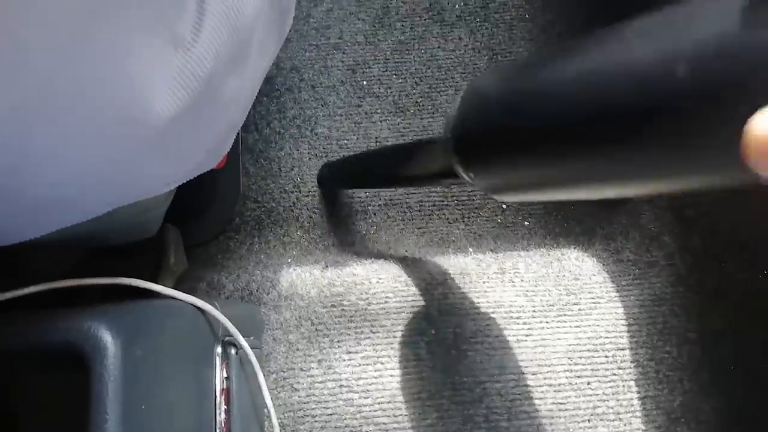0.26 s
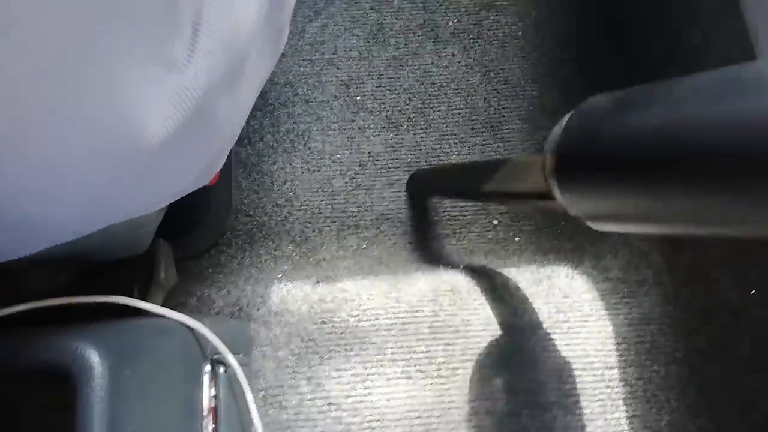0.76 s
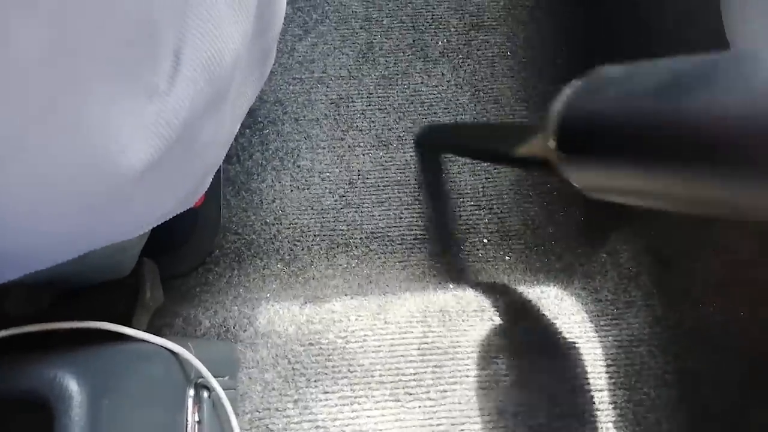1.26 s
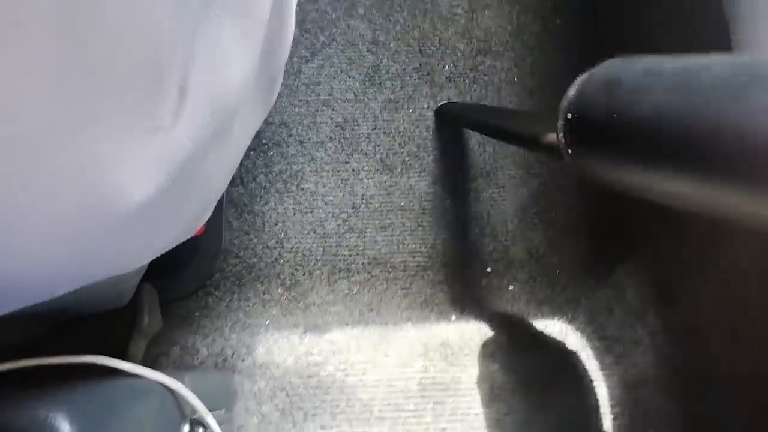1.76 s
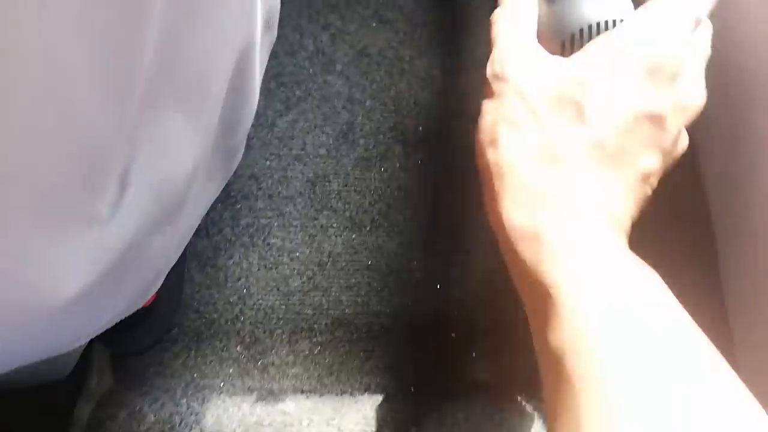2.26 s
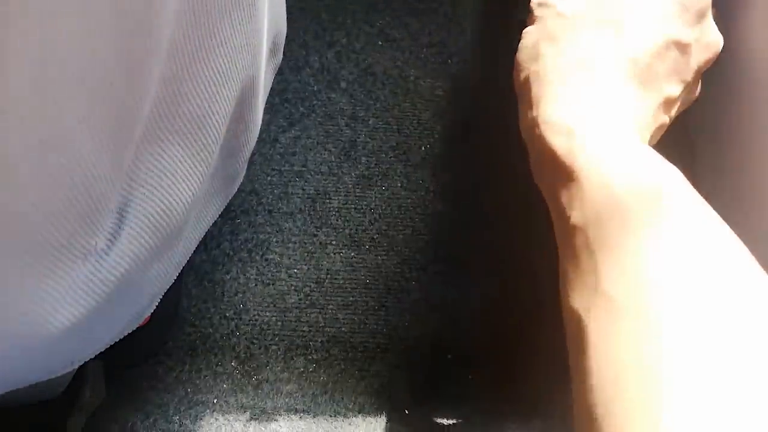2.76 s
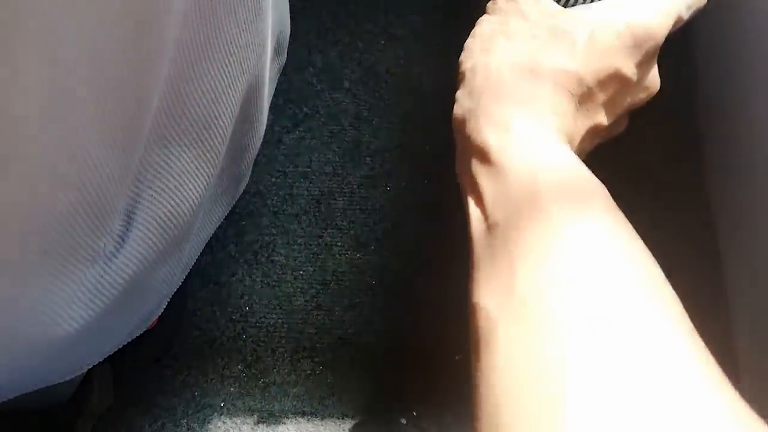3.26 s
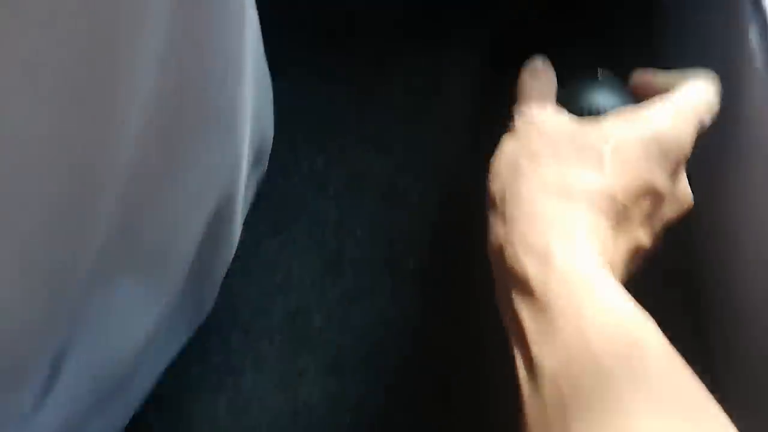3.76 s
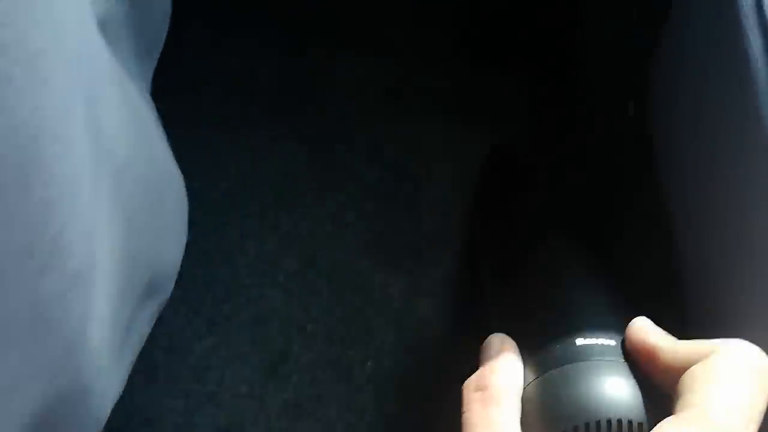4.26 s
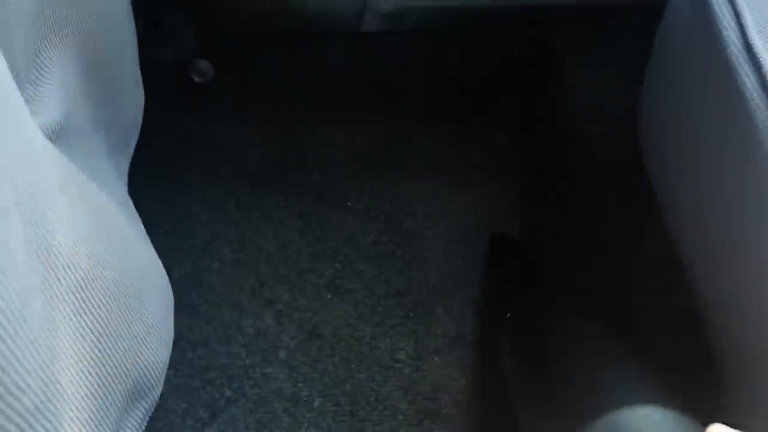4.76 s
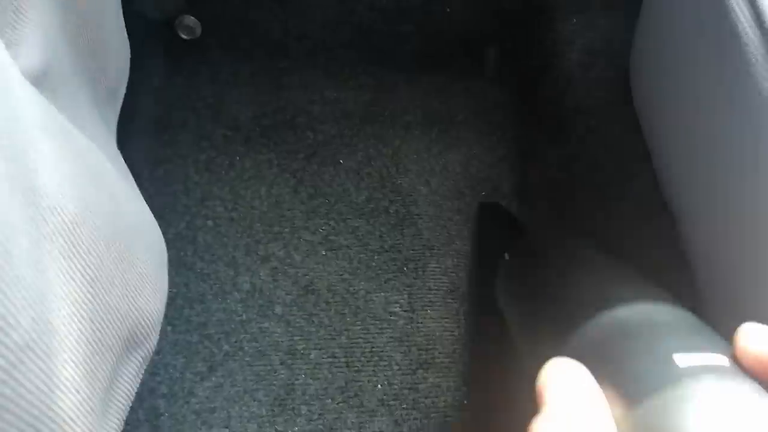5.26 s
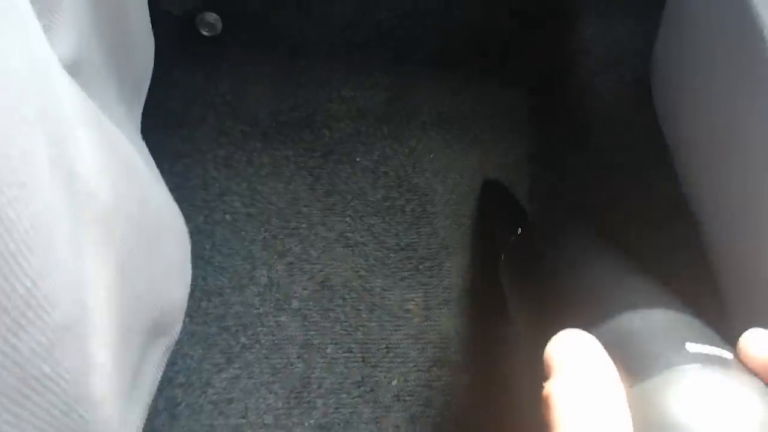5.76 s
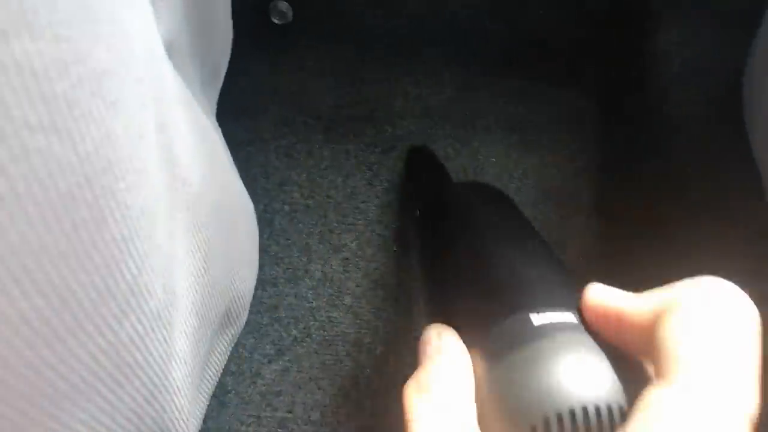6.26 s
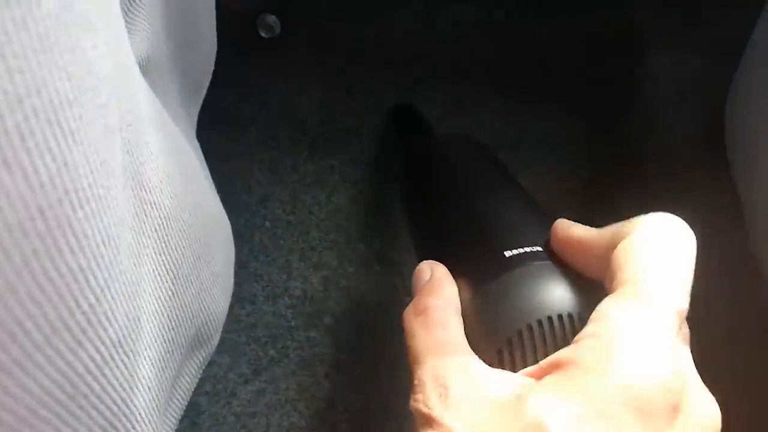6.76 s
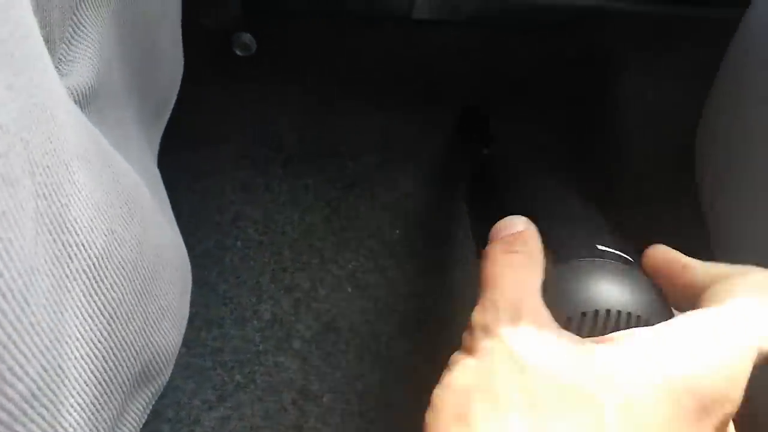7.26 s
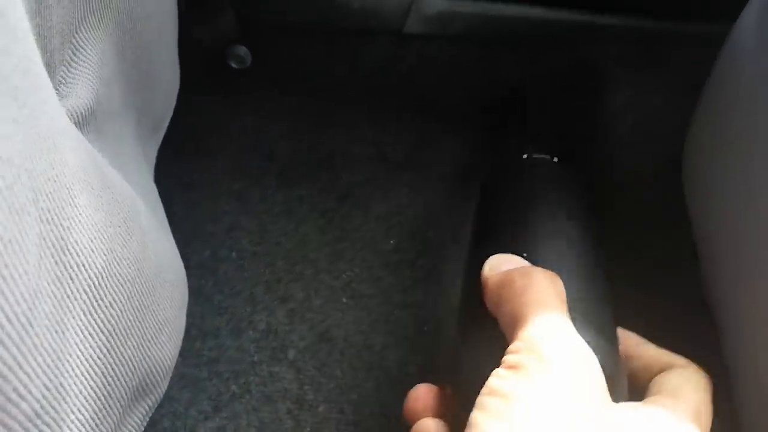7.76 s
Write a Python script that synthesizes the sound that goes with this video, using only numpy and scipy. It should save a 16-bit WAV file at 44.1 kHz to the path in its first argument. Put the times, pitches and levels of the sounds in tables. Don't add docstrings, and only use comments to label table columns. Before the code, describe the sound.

In a small car footwell, a phone's stereo microphones catch a handheld vacuum at very close range, already running at full speed. A steady mid-pitched hum near 525 Hz carries a piercing fan whine near 3.7 kHz and many thinner high tones, with nozzle air roaring and vents hissing. Underneath, the idling engine makes a deep, soft boom and cabin rumble. From 0.5 to 2 s, short strokes make the tones and air swell and dip between sides. Around 2.1 s the vacuum reaches deeper and its hum weakens; at about 4 s it returns closer and stronger, with a soft floor knock at 4.1. It nears again around 6.1, and a harder, dull knock lands at 6.55. The vacuum turns upright near 7.5, is switched off at about 7.7, and all its tones slide downward, the whine weakening fast, still winding down when the sound ends just past 8 s.

```python
import sys
import numpy as np
from scipy import signal
from scipy.fft import rfft, irfft
from scipy.io import wavfile
from scipy.ndimage import uniform_filter1d, map_coordinates

SR = 44100
rng = np.random.default_rng(int(sys.argv[2]) if len(sys.argv) > 2 else 0)


def voltage_ratio(decibels):
    exponent = np.asarray(decibels, float) / 20
    return 10 ** exponent


def waveform_to_disk(signal):
    frames = np.transpose(np.atleast_2d(signal))
    scaled = np.clip(frames, -1, 1) * 32767
    samples = np.round(scaled).astype(np.int16)
    wavfile.write(sys.argv[1], SR, samples)


N = 353593
TIME = np.arange(N) / SR
FRAME = 1024
BLADES = 7
OFF_S = 7.68

# (middle of move t/s, length/s)
MOVES = [
    (2.142, 0.49),
    (4.105, 0.48),
    (6.136, 0.21),
    (7.486, 0.13),
]
# (t/s, level/dB)
NEAR = [(0, -12), (.4, -12.5), (1.35, -13), (1.6, -12.5), (2.05, -13.5), (2.3, -16.5), (2.7, -15),
        (3.55, -19), (3.78, -17), (3.97, -12), (4.25, -11), (4.6, -12), (4.9, -10), (5.8, -12.5),
        (6.5, -10), (6.8, -12), (7.35, -15), (7.55, -11.5)]


def unit(x):
    return x / np.sqrt(np.mean(np.abs(x) ** 2, axis=-1, keepdims=True) + 1e-20)


def along(hz_points, values, hz):
    return np.interp(np.log(hz + 1), np.log(np.asarray(hz_points) + 1), values)


def curves(rows):
    s, *cols = np.transpose(rows)
    return np.array([np.interp(TIME, s, c) for c in cols])


def held(values):
    s = [0] + [t + side * length / 2 for t, length in MOVES for side in (-1, 1)] + [N / SR]
    return np.array([np.interp(TIME, s, np.repeat(v, 2)) for v in np.atleast_2d(values)])


def bell(x, centre, half):
    return np.exp(-((x - centre) / half) ** 2)


def wobble(rate):
    return map_coordinates(rng.standard_normal(N // 100), [np.arange(N) * rate / SR], order=2)


def wobbles(rate):
    return np.array([wobble(rate), wobble(rate)])


def angle(hz):
    return 2 * np.pi * np.cumsum(hz) / SR


def pair(phase, db, lead):
    return np.sqrt(2) * voltage_ratio(db) * np.sin([phase + lead / 2, phase - lead / 2])


def tone(phase, db, gain):
    return np.sqrt(2) * voltage_ratio(db) * (gain * np.exp(1j * phase)).imag


def fading(rate, steady):
    drift = np.array([wobble(rate) + 1j * wobble(rate) for _ in range(2)])
    turn = np.exp(1j * 1.32 * np.array([wobble(0.807), wobble(0.633)]))
    return unit(steady * turn + drift)


def blur(field, bins, frames):
    for _ in range(2):
        field = uniform_filter1d(field, bins, axis=-2)
        field = uniform_filter1d(field, frames, axis=-1)
    return field / field.std()


def spectrum(x):
    return signal.stft(x, SR, nperseg=FRAME)


def sound(z):
    return signal.istft(z, nperseg=FRAME)[1][:, :N]


def engine(boom_db):
    # (multiple of firing rate, level/dB)
    idle_orders = [(.5, -29), (.75, -30), (1, -1), (2, -24), (3.002, -25), (5, -32.5)]
    firing = angle(30.7 + 0.123 * wobble(1.4))
    out = 0
    for k, level in idle_orders:
        base = boom_db if k < 1.5 else boom_db.mean()
        waver = 3 * (k != 1) * wobble(5.4)
        out = out + pair(k * firing, [base + level + waver] * 2, 0)
    return out


def cabin_rumble(boom_db):
    # (f/Hz, level per Hz/dB)
    cabin = [(8, -7), (22, 3), (40, -0.5), (110, -9), (145, -1.5), (250, -4), (440, 0), (620, -26)]
    # (f/Hz, likeness/share)
    likeness = [(60, 0.98), (130, 1), (290, 0.63)]
    hz = np.fft.rfftfreq(N, 1 / SR)
    tilt = np.arccos(np.clip(along(*np.transpose(likeness), hz), 0, 1)) / 2
    colour = voltage_ratio(along(*np.transpose(cabin), hz)) * [np.cos(tilt), np.sin(tilt)]
    mid, side = irfft(rfft(rng.standard_normal((2, N))) * colour * (hz < 680), N)
    db = 0.058 * (boom_db - boom_db.mean()) - 46.5 + 1.7 * wobble(3.95)
    return voltage_ratio(db) * unit(np.array([mid + side, mid - side]))


def car():
    # (t/s, level/dB)
    boom = [(0.0, -34.5), (1.16, -31.5), (1.45, -34.5), (2.72, -29), (4.62, -35), (5.07, -29.5),
            (6.01, -40), (8.0, -27.5), (8.02, -27.5)]
    boom_db = curves(boom)[0]
    return engine(boom_db) + cabin_rumble(boom_db)


def bumps():
    # (t/s, level/dB)
    knocks = [
        (4.131, -21),
        (6.55, -10),
    ]
    # (f/Hz, level/dB, time to fall by 60 dB/s)
    floor_pan = [(88, -15, 0.14), (138, -9.5, 0.14), (159, -9, 0.13), (236, 2.5, 0.027), (660, 7.5, 0.014)]
    out, t = np.zeros(N), np.arange(SR // 5) / SR
    onset = 1 - np.exp(-t / 0.0069)
    for s, db in knocks:
        ring = sum(voltage_ratio(level - 60 * t / t60) * np.sin(2 * np.pi * hz * t) for hz, level, t60 in floor_pan)
        out[round(s * SR):][:len(t)] += voltage_ratio(db) * ring * onset
    return out


def coasting():
    return np.maximum(TIME - OFF_S, 0)


def swing():
    # (t/s, size, half length/s)
    strokes = [(0.587, 0.46, 0.15), (0.896, 0.47, 0.13), (1.426, 0.46, 0.11), (1.895, 0.35, 0.095),
               (2.84, -0.11, 0.54), (3.2, 0.28, 1)]
    return sum(size * bell(TIME, s, half) for s, size, half in strokes)


def air_levels():
    air_db = [(-25.5, -21, -29.5, -27.5, -28), (-28.5, -33.5, -32, -32.5, -34.5),
              (-24, -24, -24, -26, -30.5), (-23.5, -30, -25.5, -27, -26), (-27, -25, -19.5, -19.5, -21.5),
              (-20, -24, -26.5, -25.5, -26)]
    stroke_air_db = (-1, 1, 5, 9, 0.5, 10)
    # (change after the switch/dB per s, per air row)
    coast_air_db = (-4, 16, -29, -12.5, 0, -17)
    near = curves(NEAR)[0]
    near_db = 0.35 * (near - near.mean())
    return held(air_db) + near_db + np.outer(stroke_air_db, swing()) + np.outer(coast_air_db, coasting())


def rush(colour, patchy_db):
    # (f/Hz, share)
    common = [(600, 0.18), (1500, 0.99), (2500, 0.94), (6000, 0.53), (12000, 0.74)]
    # (f/Hz, share)
    echoed = [(600, 0.061), (1500, 0.012), (2500, 0.94), (6000, 0.73)]
    hz, _, z = spectrum(rng.standard_normal((3, N + FRAME)))
    alike = np.clip(along(*np.transpose(common), hz), 0, 1)[:, None]
    echo = np.clip(along(*np.transpose(echoed), hz), 0, 1)[:, None]
    re, im = blur(rng.standard_normal((2, 2) + z.shape[1:]), bins=3, frames=80)
    path = np.sqrt(1 - echo) + np.sqrt(echo / 2) * (re + 1j * im)
    ports = np.sqrt(alike) * path * z[0] + np.sqrt(1 - alike) * z[1:]
    patches = blur(rng.standard_normal(ports.shape), bins=8, frames=8)
    f, left, right = np.transpose(colour)
    points = np.r_[f[0] * .85, f, f[-1] * 1.08]
    db = np.array([along(points, np.r_[-60, side, -60], hz) for side in (left, right)])
    return unit(sound(ports * voltage_ratio(db[:, :, None] + patchy_db * patches)))


def combed(x):
    comb_hz = [(7100, 7000, 6200, 7250, 7340), (6500, 5480, 5400, 7200, 8400)]
    comb_depth_db = (0.83, 1.4, 1.8, 1.57, 3.6)
    step_hz = 2600
    hz, t, z = spectrum(x)
    at = np.minimum((t * SR).astype(int), N - 1)
    crest = held(comb_hz)[:, at]
    ripple = np.cos(2 * np.pi * (hz[:, None] - crest[:, None]) / step_hz)
    return unit(sound(z * voltage_ratio(held(comb_depth_db)[:, at] * ripple)))


def shaded(x):
    # (t/s, half length/s, f/Hz, half width/Hz, level/dB)
    left_shades = [(.5, .7, 5700, 500, -5), (1.0, 0.55, 1950, 120, 4.5), (2.15, 0.18, 5100, 900, 9),
                   (2.8, 0.14, 4200, 350, -7), (2.8, 0.28, 6000, 696, -4), (3.78, .07, 4150, 250, -15),
                   (3.9, .7, 2630, 700, -3), (4.52, .26, 1820, 111, -35), (4.95, 0.26, 1630, 120, -21),
                   (5.5, 1.5, 8150, 500, 2), (5.9, 0.2, 6540, 700, 5), (6.9, 0.77, 6500, 500, -0.5),
                   (7.0, 0.33, 1900, 140, -6), (7.75, 0.34, 7900, 500, 11), (7.8, .3, 3200, 900, 4),
                   (7.5, .9, 1550, 150, -5), (7.92, .12, 620, 80, 8), (3.0, 1.3, 8100, 200, 6),
                   (5.7, 0.51, 4650, 250, -2)]
    right_shades = [(1.0, 1.1, 1860, 102, 0), (1.3, 0.63, 2110, 120, 5.5), (3.2, 0.11, 4150, 200, -10),
                    (3.3, .6, 5100, 250, 6), (3.2, 0.66, 2500, 700, 8), (4.52, 0.21, 1820, 110, -19),
                    (4.9, .6, 3800, 200, -13), (5.8, .22, 4300, 220, -16), (4.9, 0.65, 8200, 1200, -7),
                    (7.0, 0.4, 1880, 140, -9), (7.8, 0.32, 2700, 300, -11), (7.8, .3, 7300, 500, -4),
                    (7.85, 0.36, 5000, 1200, -6), (6.8, 1.8, 3430, 160, -3), (7.92, .12, 620, 80, 9),
                    (2.8, .7, 6400, 300, 2), (5.9, .4, 1030, 140, 11)]
    hz, t, z = spectrum(x)
    db = [sum(g * np.outer(bell(hz, c, w), bell(t, s, half)) for s, half, c, w, g in port)
          for port in (left_shades, right_shades)]
    return sound(z * voltage_ratio(np.array(db)))


def air(levels):
    # (f/Hz, left level/dB, right level/dB)
    tube_colour = [(650, -30, -9), (824, -4, -14), (1070, -2.5, -31), (1243, -3.5, 10), (1250, -7.5, -0.5),
                   (1450, 6, -3), (1604, 10, 6.5), (1600, 2.5, -28), (1757, 3.5, -8)]
    shell_colour = [(1690, -12, -26), (2050, -1, -38), (2174, 4, 1), (2660, 4.5, 9), (3030, 4, -6),
                    (3546, -0.5, 10), (4630, -30, -8)]
    vent_colour = [(3760, -1.5, -11.5), (5020, 0.5, -0.5), (6460, 4.5, -6.5), (7060, -3.5, -6),
                   (8840, 2.5, -3.5), (10450, -10.5, -6.5), (11000, -9, -0.5), (11870, -5, -9),
                   (13400, -18, -19), (15600, -18, -16), (16200, -27, -17)]
    leak_colour = [(1650, -5, -3), (1976, 9, -8), (2250, -15, -2.5)]
    leak_db = [(-41.5, -26, -32.5, -41, -39), (-29.5, -37.5, -39.5, -34, -33)]
    flutter = .4 * wobble(9)
    tube = voltage_ratio(levels[0:2] + flutter) * rush(tube_colour, patchy_db=.8)
    shell = voltage_ratio(levels[2:4] + flutter) * rush(shell_colour, patchy_db=.8)
    vents = voltage_ratio(levels[4:6] + 2.3 * flutter) * combed(rush(vent_colour, patchy_db=1.94))
    leak = voltage_ratio(held(leak_db) + flutter) * rush(leak_colour, patchy_db=.8)
    return shaded(tube + shell + vents + leak)


def rotor_speed():
    # (t/s, speed/turns per s)
    speed_points = [(0, 525.9), (.46, 526.2), (.69, 524.9), (1.38, 526.4), (1.61, 525.8), (1.84, 528),
                    (2.3, 523.3), (2.76, 527.3), (3.0, 526.1), (3.68, 524.7), (4.3, 524.6), (4.6, 522.7),
                    (4.83, 524.9), (5.52, 524.5), (5.8, 526.7), (6.35, 525.2), (6.67, 528.6), (6.9, 526)]
    sag = .005 * np.maximum(TIME - speed_points[-1][0], 0)
    driven = curves(speed_points)[0] * (1 - sag)
    return driven, driven / (1 + .83 * coasting())


def body_db(hz):
    # (f/Hz, half width/Hz, level/dB)
    body = [(537, 79, 13), (827, 67, 17.5), (3010, 140, 9.5), (3194, 40, -9.5), (3300, 70, 2),
            (3530, 62, -23), (4200, 120, 4.5), (4500, 70, -12), (5740, 130, -2), (6200, 60, -17),
            (6700, 210, 2.5), (8800, 300, 12), (9900, 400, -3), (11700, 500, 13)]
    return sum(db * bell(hz, centre, half) for centre, half, db in body)


def order_db(k):
    # (t/s, order, left level/dB, right level/dB, half length/s)
    flares = [(.25, 6, 1, -14, 0.15), (.55, 14, -5, 6.5, .05), (.65, 21, 3, 8, 0.26), (.88, 14, 0, 7, .05),
              (1.1, 9, 0, 15, 0.13), (1.373, 14, -8, 5.5, 0.088), (1.68, 9, -4, 15, 0.067),
              (1.752, 5, 2, 11.5, 0.37), (1.8, 21, 15, 5, 0.096), (2.054, 9, 11, 5, 0.22),
              (2.183, 9, -10, -1, 0.027), (2.24, 2, 7, 3, 0.2), (2.65, 6, 9.5, 2.5, 0.25),
              (3.02, 6, -22, -10, 0.032), (3.106, 14, 8, -4, 0.067), (3.454, 9, 13, -4, .06),
              (3.5, 10, -3, 7.5, 0.54), (3.6, 14, -4, 2, 0.038), (3.6, 9, 9, -12, 0.055),
              (3.95, 6, 11.5, 8, .1), (4.387, 14, 5, -5, 0.065), (4.54, 3, 9, 11, .3),
              (4.55, 9, 2, -4, 0.24), (4.7, 9, 7, 12, 0.095), (4.806, 8, 13.5, -5, 0.23),
              (4.944, 2, 9.5, 12.5, 0.25), (5.0, 10, 8, 1, .15), (5.4, 5, 5.5, 0, .25),
              (5.553, 21, 18.5, -2, .15), (5.55, 9, 3, 12.5, 0.087), (5.952, 5, 7, -11, 0.21),
              (6.098, 14, 6.5, 1, 0.23), (6.15, 8, 10, -1, 0.12), (6.203, 6, 7, 8, 0.21),
              (6.49, 5, 12, 5, .08), (6.615, 3, 5.5, 7, .4), (6.646, 9, 13, -4, 0.052),
              (7.05, 8, 15, -5, 0.078), (7.103, 14, 8.5, -12, 0.077), (7.59, 9, 16, 5, 0.086)]
    last_flares = [(7.597, 10, 11, 5, 0.075), (7.55, 3, 9, 9, 0.042), (7.76, 6, 3.5, -2, 0.044),
                   (8.6, 5, 9, -4, .1), (7.75, 15, 5, 0, .06), (7.8, 14, 7, 5, 0.085),
                   (7.98, 14, 5, 0, .06), (1.27, 5, 4, 3.5, 0.16), (5.8, 5, -4, 0, .08),
                   (7.93, 21, 13, 0, 0.087), (7.824, 9, 8, 0, 0.1), (7.9, 8, 18, 0, 0.11),
                   (7.95, 12, 8, -7, .07), (7.95, 28, 10, 4, .1)]
    flare = sum(np.outer((left, right), bell(TIME, s, half))
                for s, order, left, right, half in flares + last_flares if round(order) == k)
    driven, speed = rotor_speed()
    off = int(OFF_S * SR)
    crossing = body_db(k * speed[off:]) - body_db(k * driven[off:])
    return flare + np.pad(crossing, (off, 0)) - 33.5 * coasting()


def hum(turn):
    shadow_db = (-11.5, -3, -5.5, -5, -4.5)
    hum_lead = (2.3, 1.32, 1.48, 1.56, 2.13)
    near = curves(NEAR)[0]
    before_move = TIME < MOVES[0][0]
    shadow = held(shadow_db)[0] - 7 * np.maximum(swing(), 0) * before_move
    db = np.array([near, near + shadow]) + order_db(0.86) + 7 * coasting()
    return pair(turn, db, held(hum_lead)[0])


def third_order(turn):
    third_db = [(-25, -25, -33, -32, -36), (-39, -33, -35, -32, -34)]
    return pair(3 * turn, held(third_db) + order_db(3) + 1.3 * wobbles(4), -.5)


def blade_tones(turn):
    # (t/s, left level/dB, right level/dB, left lead/rad)
    beam_points = [(0, -24, -11, 0.5), (.5, -23, -11.5, 1.26), (1.2, -19.5, -14.5, 1.1),
                   (1.7, -20.5, -14, 1.1), (2.0, -15, -8, 1.1), (2.2, -17.5, -31.5, 7.05),
                   (2.75, -34, -15, 8.6), (3.15, -18.5, -13, 11.6), (3.45, -15, -11.5, 8.5),
                   (3.9, -28.5, -21.5, 6.6), (4.27, -14, -47, 9.5), (4.8, -12, -22.5, 4.02),
                   (5.85, -19, -29, 5.8), (6.0, -5.5, -21, 5.8), (6.2, -15.5, -35, 6.6),
                   (6.7, -12, -19, 6.4), (7.42, -9, -42, 7.1), (7.55, -15, -24, 2.3)]
    beam_waver_db = (1.55, 0.97, 3.1, 1.2, 2.4)
    # (t/s, depth/dB, half length/s)
    left_nulls = [(2.02, 16, .04), (2.3, -3.5, 0.045), (2.64, 10, 0.12), (3.03, 14, 0.024),
                  (3.44, 12, 0.048), (3.85, 0, .06), (4.02, 3, 0.1), (4.72, 9, 0.23), (7.5, 5, 0.017)]
    right_nulls = [(.22, 0.89, 0.077), (.57, 9.1, 0.055), (.85, 2.4, 0.04), (1.2, 4.4, .07),
                   (1.85, 7.7, 0.17), (2.12, 40, 0.037), (2.38, 5.1, 0.024), (3.03, 15, 0.036),
                   (3.15, 19, 0.13), (3.3, 8.2, 0.053), (3.57, 34, 0.11), (4.12, 9.5, 0.035),
                   (4.35, 5.7, 0.038), (5.2, 2.9, 0.033), (5.7, 6.1, 0.15), (6.15, 9, 0.031),
                   (6.38, 22, 0.056)]
    octave_db = [(-33, -29, -22.5, -23, -21), (-24.5, -31, -30, -33, -25)]
    beam = curves(beam_points)
    nulls = np.array([sum(db * bell(TIME, s, half) for s, db, half in port)
                      for port in (left_nulls, right_nulls)])
    waver = held(beam_waver_db) * wobbles(9) + 0.6 * wobble(25)
    out = pair(BLADES * turn, beam[0:2] - nulls + order_db(BLADES) + waver, beam[2])
    waver = 1.6 * wobbles(6) + 2.2 * wobble(16)
    return out + pair(2 * BLADES * turn, held(octave_db) + order_db(2 * BLADES) + waver, 2 * beam[2])


def whine(turn):
    whine_orders = (2, 4, 5, 6, 8, 9, 10, 15, 17, 21)
    whine_db = [(-31, -34, -33, -34, -38), (-30, -37, -38, -36, -40), (-31, -34, -33, -42, -33),
                (-30, -41, -39, -43, -40), (-31, -36, -32, -36, -33), (-31, -37, -36, -39, -39),
                (-23, -33, -27, -34, -25), (-27, -27, -30, -33, -31), (-39, -45, -36, -36, -26),
                (-35, -42, -48, -43, -37), (-30, -35, -32, -33, -31), (-37, -27, -31, -30, -36),
                (-49, -45, -38, -41, -31), (-37, -34, -42, -46, -42), (-44, -39, -34, -32, -24),
                (-31, -38, -43, -45, -33), (-43, -43, -41, -39, -29), (-39, -43, -43, -45, -37),
                (-43, -44, -39, -45, -36), (-30, -42, -37, -44, -38)]
    chatter_db = (-3.5, 2.5, -2, -2, -6)
    levels = dict(zip(whine_orders, held(whine_db).reshape(-1, 2, N)))
    out = np.zeros((2, N))
    for k, db in levels.items():
        out += tone(k * turn, db + order_db(k), fading(rate=11, steady=2.85))
    chatter = 5 * turn + angle(24 + 7 * wobble(12))
    db = levels[5] + order_db(5) + held(chatter_db)[0] + 2.6 * wobble(7)
    return out + pair(chatter, db, 0.91)


def weak_orders(turn, levels):
    # (multiple of the turning rate, level/dB)
    orders = [(11, -55), (12, -37.5), (13, -41.5), (16, -39), (18, -35), (19, -40), (20, -65), (22, -67),
              (23, -57), (28, -40.5)]
    top_orders = [(k, -50 - 1.5 * (k - 24)) for k in range(24, 28)]
    change = levels - levels.mean(axis=1, keepdims=True)
    out = np.zeros((2, N))
    for k, db in orders + top_orders:
        k = round(k)
        row = 0 if k < 4 else 2 if k < 9 else 4
        with_air = 0.88 * change[row:row + 2]
        out += tone(k * turn, db + order_db(k) + with_air, fading(rate=5, steady=0.31))
    return out


def motor(levels):
    speed = rotor_speed()[1]
    turn = angle(speed + .2 * wobble(30) + .35 * wobble(6))
    return hum(turn) + third_order(turn) + blade_tones(turn) + whine(turn) + weak_orders(turn, levels)


def scene():
    levels = air_levels()
    return car() + bumps() + air(levels) + motor(levels)


def low_pass(x):
    return signal.sosfilt(signal.butter(12, 15680, fs=SR, output="sos"), x)


def record(dry):
    hard = 30
    clipped = dry / (1 + np.abs(dry) ** hard) ** (1 / hard)
    return low_pass(clipped)


dry = scene()
out = record(dry)
waveform_to_disk(out)
```